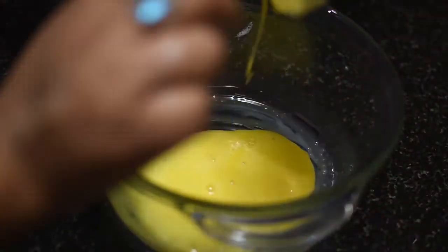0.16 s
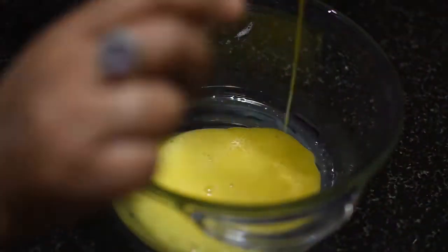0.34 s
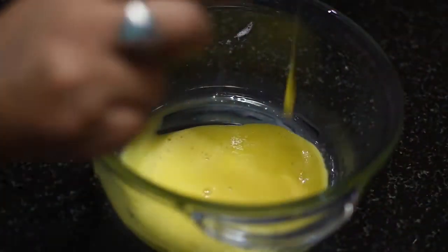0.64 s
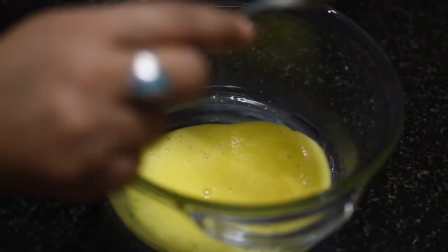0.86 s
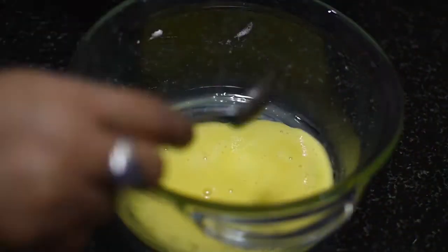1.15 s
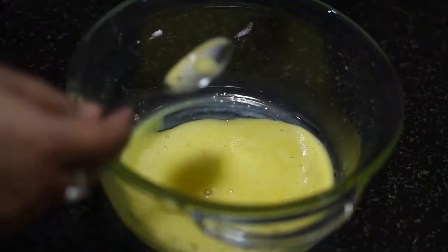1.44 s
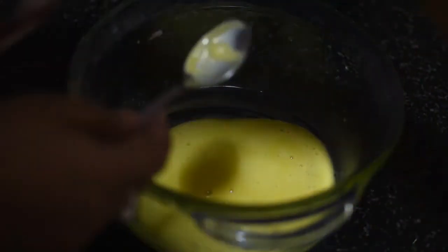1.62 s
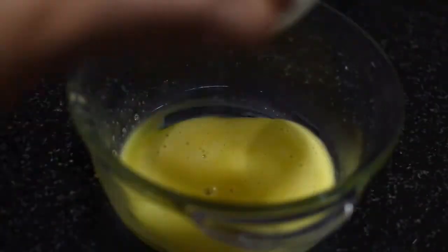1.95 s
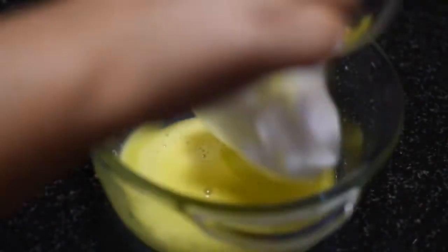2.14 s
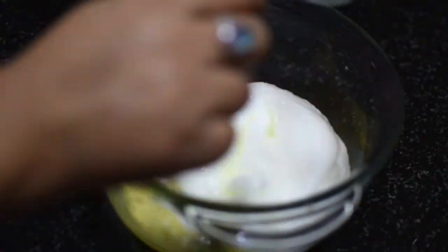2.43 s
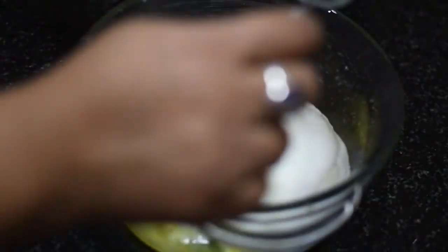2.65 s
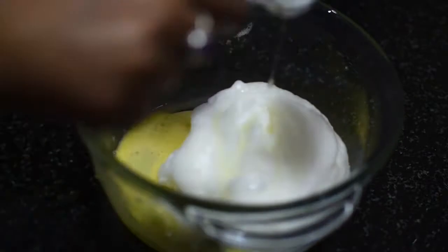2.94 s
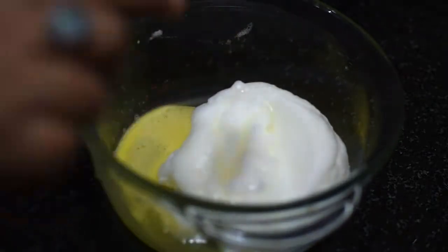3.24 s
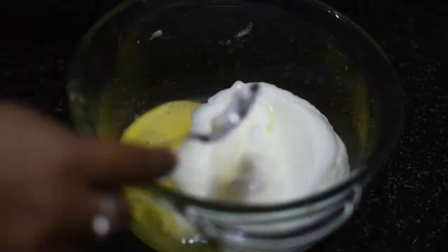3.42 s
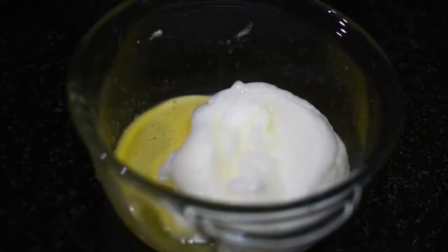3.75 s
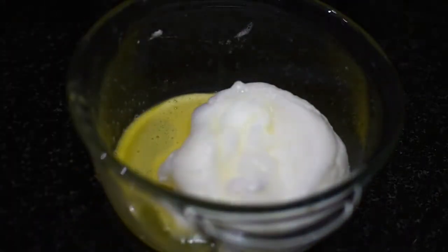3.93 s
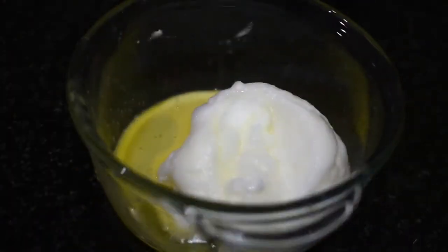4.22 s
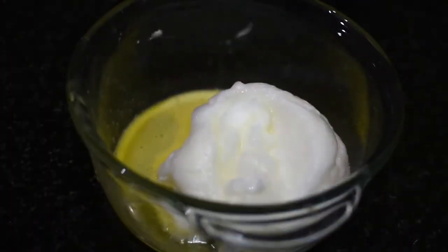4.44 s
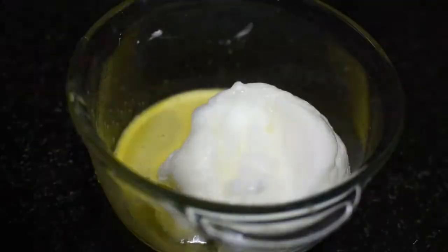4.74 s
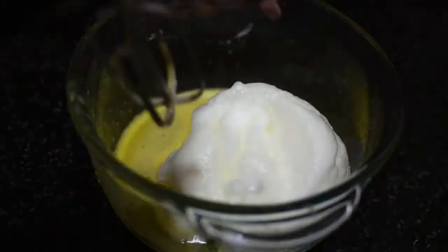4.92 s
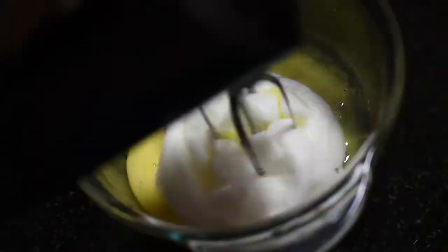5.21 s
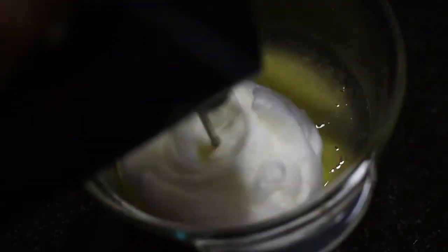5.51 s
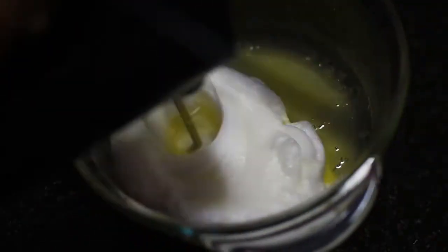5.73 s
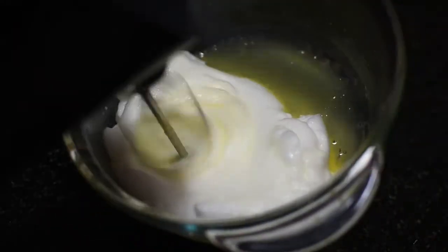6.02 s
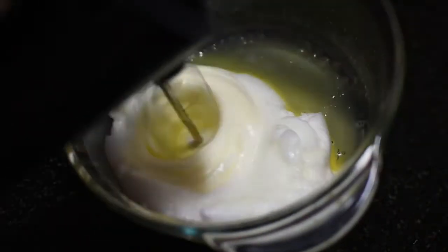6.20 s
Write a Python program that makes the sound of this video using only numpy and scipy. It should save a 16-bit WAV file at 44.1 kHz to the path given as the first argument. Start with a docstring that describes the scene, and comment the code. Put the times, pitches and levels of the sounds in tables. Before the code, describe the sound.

An electric hand mixer whines loudly at the very start and cuts off after a tenth of a second. A spoon then knocks and scrapes inside a cup until about 1.3 seconds, and the cup is set down around 1.7. From 2.3 to 3.3 seconds the spoon scrapes and taps a dish, a little more softly, with dull bumps on the counter. At about 4.2 the dish lands with a sharp clack and slides briefly. Wire beaters tap a glass bowl at 4.5 and clatter loudly against it near 4.8, followed by a few faint ticks. At 5.8 the mixer restarts with a jolt, its whine climbing quickly over rattling gears, and runs until the end at about 6.4 seconds. Every ring and scrape is clipped short, as though the action were sped up. It is all close, over the faint rush of a quiet kitchen.

```python
"""An electric hand mixer whips eggs in a glass bowl: its gears rattle and its motor whines, then it stops.
A spoon knocks and scrapes yolk out of a cup, then foam out of a dish, making each one ring.
The beaters clatter on the bowl, and the motor spins up again, close by in a quiet kitchen.
The action is sped up by cutting it into short slices, so every ring and scrape ends abruptly."""
import sys
import numpy as np
from scipy import signal
from scipy.fft import rfft, irfft, next_fast_len
from scipy.io import wavfile
from scipy.ndimage import uniform_filter1d, map_coordinates

SR = 44100
rng = np.random.default_rng(int(sys.argv[2]) if len(sys.argv) > 2 else 0)


def materialize(psi):
    """Save the field psi as 16-bit PCM at rate SR to the path in sys.argv[1].

    A 1-D psi becomes a single channel; in a 2-D psi each row is a channel.
    """
    bounded = np.clip(np.atleast_2d(psi).T, -1, 1)
    quanta = np.round(bounded * 32767).astype(np.int16)
    wavfile.write(sys.argv[1], SR, quanta)


N = 280917
T = np.arange(N) / SR

# Tones of the motor, gears and fan: times_shaft_speed, level_db, unsteadiness_radians
MOTOR_TONES = [(1.5, -28, 0.97), (2, -18.5, 0.4), (3.28, -36, 0.68), (3.44, -26, 0.45), (4, -20, 0.62),
               (4.66, -17.5, 0.32), (5.95, -21.5, 0.79), (6.2, -16.5, 0.3), (8, -21.5, 0.74),
               (10, -10.5, .3), (11.3, -30, .7), (20, -28, 0.35)]
# Pitches where the motor's whine swells as it climbs in steps: pitch_hz, width_hz, boost_db
WHINE_SWELLS = [(1286, 110, 7.5), (2850, 180, 6.5), (5260, 760, 16.5), (6300, 320, 13.5), (6800, 200, 9)]
# Tone color of the gear noise, before the stop and after the restart: pitch_hz, level_db
FIRST_GEAR_COLOR = [(59, -62), (100, -45), (214, -44), (307, -19), (382, -7), (457, -17), (605, -11.5),
                    (754, -13.5), (940, -10.5), (3890, -11.5), (5800, -19.5), (7990, -24), (11900, -41),
                    (15500, -78), (22000, -120)]
RESTART_GEAR_COLOR = [(59, -82), (100, -55), (289, -22), (360, -14), (467, -13.5), (739, -9.5), (1060, -10),
                      (1780, -13.5), (2050, -15), (2310, -10), (3180, -11), (3660, -12.5), (4380, -12),
                      (10400, -31.5), (11900, -47), (15500, -84), (22000, -120)]
# Modes, or ringing pitches, of the gear housing, cup, dish and bowl: pitch_hz, width_hz, boost_db
HOUSING_MODES = [(597, 120, 7.5), (757, 41, 4), (1223, 74, 7.5), (1815, 330, 7.5), (2340, 180, 5.5),
                 (2810, 220, 3), (3626, 160, 5)]
CUP_MODES = [(1062, 200, 1.5), (1326, 170, 2.5), (2890, 300, 5), (3300, 200, 3), (3990, 330, 4),
             (5570, 520, 5), (8460, 240, 8), (9530, 330, 5.5)]
DISH_MODES = [(988, 260, 3.9), (1343, 116, 3.1), (2480, 245, 7.3), (4150, 250, 9.1), (5230, 190, 6.3),
              (6680, 205, 17.6), (9230, 370, 10), (9970, 210, 13)]
BOWL_MODES = [(1398, 31, 20.4), (1695, 77, 9.4), (3220, 50, 16), (4861, 52, 5.8), (5760, 80, 21.7),
              (7360, 74, 17), (8780, 56, 23.6), (9600, 80, 18.6)]
# Tone color that each way of touching puts into the object: pitch_hz, level_db
CUP_KNOCK_COLOR = [(120, -31), (750, -19), (1100, 0.5), (3000, -8.5), (5800, -12.5), (9800, -22.5),
                   (12000, -41)]
CUP_SCRAPE_COLOR = [(120, -33.5), (700, -14), (1250, 0.5), (3000, -2), (5800, -5.5), (9500, -18.5),
                    (12000, -31)]
CUP_COUNTER_COLOR = [(120, -25), (600, -9), (1300, 2), (3000, -9), (5800, -33), (9500, -38), (12000, -55)]
DISH_KNOCK_COLOR = [(120, -27.5), (700, -21), (1000, -5), (1350, 1), (3000, -6), (4200, -7), (6600, -9),
                    (9500, -16), (11000, -26.5), (12000, -38.5)]
DISH_SCRAPE_COLOR = [(120, -24), (500, -13), (1250, 3), (3000, -2.5), (5800, -8), (9500, -23.5),
                     (12000, -33)]
DISH_COUNTER_COLOR = [(120, -24.5), (450, -9), (900, -5), (1300, 1), (2200, -8.5), (3000, -15), (5800, -26),
                      (10000, -33), (12000, -55)]
BOWL_TOUCH_COLOR = [(120, -34), (300, -3.5), (1250, -0.5), (3000, -6.5), (5800, -19.5), (9000, -27.5),
                    (12000, -39)]
# One row for each touch. The spot touched favors one pitch; a freedom of 0 mutes the object's modes.
# Columns: start_s, level_db, brightness_db_per_octave, pitch_hz, freedom
CUP_KNOCKS = [(.1295, -17.5, -.6, 1392, 0.46), (.285, -20.3, 2, 5790, 1.4), (.397, -32.5, 2, 3920, .6),
              (.4645, -22.5, .5, 9600, 0.38), (.5655, -21.5, -0.5, 9600, 1.2), (.847, -19, -0.4, 9650, .5)]
CUP_SCRAPES = [(.14, -26.5, -2.5, 1144, 1), (.226, -30, -3, 1080, 1), (.357, -23.5, -1, 9450, .2),
               (.581, -29.5, -3, 2630, .5), (.624, -22.5, 2, 1377, 1.2), (.711, -21.5, 2.5, 8200, 0.93),
               (.728, -14.5, 3, 5620, 0.82), (.933, -25, 3.5, 4990, 1.3), (1.022, -30.5, 0.5, 5340, 0.79),
               (1.11, -29, -1.8, 5430, 0.99), (1.198, -32.5, -1.5, 3110, 1), (1.214, -25, 0, 3300, 2),
               (1.286, -34, -1, 1350, 2.5)]
CUP_LANDINGS = [(1.595, -26.5, 3.5, 1390, .3), (1.683, -19, -2.5, 1424, .1)]
DISH_KNOCKS = [(2.571, -24, -1.7, 2400, 1.02), (2.901, -38.5, 1, 2600, .3),
               (3.0135, -23, -0.034, 1526, 0.18), (3.3215, -18.5, 0.67, 2660, 1.43)]
DISH_SCRAPES = [(2.302, -44.5, -1, 6600, 0.27), (2.478, -37, 0, 1065, .2), (2.526, -33.5, -2, 2400, 0.71),
                (2.656, -34, 3, 6460, .3), (2.743, -29, 1, 2310, 1.3), (2.82, -35.5, -0.5, 1080, .5),
                (2.878, -31.5, -7, 2240, .3), (2.966, -33, -1.5, 876, .3), (3.098, -29.5, 0.5, 1950, 0.89),
                (3.185, -24, 1.6, 2255, 0.59), (4.069, -26.5, 5, 6850, .7)]
DISH_LANDINGS = [(4.1765, -13, 0.33, 10240, 0.3)]
DISH_SLIDES = [(4.158, -18.5, 0.48, 6900, .4), (4.2, -16.5, -0.21, 6970, 0.49), (4.245, -11.8, 2, 4350, 1),
               (4.29, -22.5, -1.5, 1160, 1)]
BOWL_TAPS = [(4.534, -33.5, -.5, 3260, .2), (4.687, -32, -.2, 1100, 0.37)]
BOWL_RUBS = [(4.574, -32.5, -0.5, 1510, .5), (4.6, -28, 1.4, 5630, 0.38), (4.732, -15.5, -1, 1624, 0.57),
             (4.746, -9, 3.5, 1483, 1.2), (4.775, -13.5, 0.5, 1500, 0.99), (4.794, -14, -3.5, 3260, 1.3),
             (4.82, -26.5, -1.5, 3280, 1.08)]
# Faint ticks of the wire beaters as the mixer is brought over: start_s, level_db
BEATER_TICKS = [(3.86, -44), (5.135, -48), (5.18, -37.5), (5.349, -44.5), (5.395, -53)]
# Dull bumps on the counter: start_s, level_db, pitch_hz, width_hz, fade_s (time to fall 60 dB)
COUNTER_BUMPS = [(0.359, -36.5, 145, 110, 0.31), (0.871, -34.5, 145, 79, 0.24), (1.96, -37, 180, 150, 0.15),
                 (2.48, -32.5, 322, 192, 0.28), (4.173, -30, 110, 240, 0.14)]
# Tone color of the quiet room: pitch_hz, level_db
ROOM_COLOR = [(15, -65.5), (25, -34.5), (65, -10.5), (182, -2.5), (218, -12.5), (283, -4), (348, -6),
              (450, -1.5), (525, -4), (613, -5.5), (1300, -7), (3040, -17), (9700, -42.5), (11900, -52),
              (15500, -94), (22000, -120)]
# Stereo width, or how strong the sides are next to the middle: pitch_hz, side_db
STEREO_WIDTH = [(100, -25), (400, -23), (1400, -20.5), (2800, -13.5), (5600, -10.5), (9500, -5.5)]

FIRST_CUT_S, SLICE_S = 0.094, 0.04415  # the action jumps ahead at evenly spaced cuts
RESTART_S = 5.789


def mixer(speed_hz, level_db, gear_color, gears_db, tones_db, hum_db, whine_db, rattle_db, low_cut_hz):
    """Gears rattle in the housing once a turn; the motor and fan sing at multiples of the shaft speed."""
    shaft_hz = speed_hz * (1 + 0.00093 * wobble(40))
    angle = 2 * np.pi * np.cumsum(shaft_hz) / SR
    pace = np.clip(shaft_hz / 375, 0, 1.1)  # about 1 at full speed
    grind = noise(lambda hz: amp(curve_at(gear_color, hz)) * resonances(HOUSING_MODES, hz), size=N)
    dull = signal.sosfiltfilt(signal.butter(4, 3300, fs=SR, output="sos"), grind)
    grind = dull + (grind - dull) * pace ** 4  # slow gears sound duller
    # The beaters turn far slower than the shaft and load the gears unevenly.
    beater_load = np.cos(angle / 19)
    rattle = unit(amp(rattle_db * np.cos(angle) + 0.16 * beater_load + 0.53 * wobble(300)))
    hum_gain = amp(hum_db + beater_load + 1.6 * wobble(22)) * pace ** 4
    hum = hum_gain * np.sin(angle + 0.49 * wobble(45))
    # The motor strains, and its tones turn rough, while it is gathering speed.
    strain = np.clip(1 - pace, 0, 0.4)
    chatter = 5.6 * strain * wobble(350)
    tones = np.zeros(N)
    for multiple, db, unsteady in MOTOR_TONES:
        lift_db = whine_db * multiple / 20  # the whine lifts the high tones most
        swell = resonances(WHINE_SWELLS, multiple * shaft_hz)
        gain = amp(db + lift_db + 4.9 * unsteady * wobble(25)) * swell
        tones += gain * np.sin(multiple * angle + unsteady * wobble(45) + chatter * multiple / 14)
    gears = amp(gears_db) * grind * rattle
    motor = np.sqrt(2) * (hum + amp(tones_db) * np.sqrt(pace) * tones)
    low_cut = signal.butter(2, low_cut_hz, "high", fs=SR, output="sos")  # a small body gives little bass
    return amp(level_db) * signal.sosfilt(low_cut, gears + motor)


def spin_up(full_hz, surge_hz, surge_s, creep_hz, creep_s):
    """Shaft speed in Hz: the motor breaks free, surges, then creeps to full speed, slice by slice."""
    slice_middle = next_cut(T) - SLICE_S / 2
    glide = 0.375  # share of the rise heard inside a slice; the rest is a step at the cut
    running_s = np.maximum(slice_middle + glide * (T - slice_middle) - RESTART_S, 0)
    speed_hz = full_hz - surge_hz * np.exp(-running_s / surge_s) - creep_hz * np.exp(-running_s / creep_s)
    breaking_free = 1 - 0.58 * np.exp(-np.maximum(T - RESTART_S, 0) / 0.018)
    return breaking_free * uniform_filter1d(speed_hz, size=180)


def start_jolt(start_s, level_db, pitch_hz, width_hz, swell_s):
    """The twist of the starting motor jolts the housing, which rings briefly."""
    track, t = np.zeros((2, N)), np.arange(2048) / SR
    ring = noise_band(pitch_hz, width_hz, size=len(t))
    swell = (t / swell_s) ** 2 * np.exp(2 * (1 - t / swell_s))
    add(track, start_s, amp(level_db) * ring * swell)
    return track


def bowl():
    """The beaters tap the glass bowl and rub along it."""
    glass = dict(modes=BOWL_MODES, tail_db=-19, tail_db_per_s=226, dull_hz=4000)
    taps = touches(BOWL_TAPS, BOWL_TOUCH_COLOR, spot_db=14, purity=0.05, fade_db_per_s=128,
                   click_db=12, click_s=0.0022, **glass)
    rubs = touches(BOWL_RUBS, BOWL_TOUCH_COLOR, spot_db=10.5, purity=0.15, fade_db_per_s=100, **glass)
    return taps + rubs


def cup():
    """The spoon knocks and scrapes the yolk out of the cup, which is then set down."""
    body = dict(modes=CUP_MODES, tail_db=-17.5, tail_db_per_s=150, dull_hz=6980)
    knocks = touches(CUP_KNOCKS, CUP_KNOCK_COLOR, spot_db=13, purity=0.2, fade_db_per_s=169.5,
                     click_db=15, click_s=0.0043, **body)
    scrapes = touches(CUP_SCRAPES, CUP_SCRAPE_COLOR, spot_db=11.5, purity=0.08,
                      fade_db_per_s=117.5, **body)
    landing = touches(CUP_LANDINGS, CUP_COUNTER_COLOR, spot_db=7.5, purity=0.05,
                      fade_db_per_s=124, **body)
    return knocks + scrapes + landing


def dish():
    """The spoon knocks and scrapes the foam out of the dish, which lands on the counter and slides."""
    body = dict(modes=DISH_MODES, tail_db=-16.5, tail_db_per_s=310, dull_hz=4070)
    knocks = touches(DISH_KNOCKS, DISH_KNOCK_COLOR, spot_db=9.5, purity=0.25, fade_db_per_s=109,
                     click_db=14.5, click_s=0.0041, **body)
    scrapes = touches(DISH_SCRAPES, DISH_SCRAPE_COLOR, spot_db=10.5, purity=0.056,
                      fade_db_per_s=116, **body)
    landing = touches(DISH_LANDINGS, DISH_COUNTER_COLOR, spot_db=12, purity=0.05, fade_db_per_s=130,
                      click_db=13, click_s=0.0033, **body)
    slides = touches(DISH_SLIDES, DISH_COUNTER_COLOR, spot_db=11, purity=0.14, fade_db_per_s=66, **body)
    return knocks + scrapes + landing + slides


def touches(rows, touch_color, modes, spot_db, purity, fade_db_per_s, tail_db, tail_db_per_s, dull_hz,
            click_db=None, click_s=None):
    """Each touch rings the object, a knock with a click first; the next cut leaves a faint, dull tail."""
    track, t = np.zeros((2, N)), np.arange(8192) / SR
    for start_s, level_db, brightness, pitch_hz, freedom in rows:
        length_s = next_cut(start_s + 0.005) - start_s  # at least 5 ms
        spot = [(pitch_hz, 60 + 0.04 * pitch_hz, spot_db)]
        echo_s = rng.uniform(0.000595, 0.0016)  # the trip to the object's wall and back varies by stroke
        tone_share = min(purity * freedom, 1)

        def color(hz):
            """Strength of each pitch; a pressed utensil lets the object ring less freely."""
            push = amp(curve_at(touch_color, hz) + brightness * np.log2(1 + hz / 300))
            wall_echo = np.abs(1 + 0.33 * np.exp(-2j * np.pi * hz * echo_s))
            return push * resonances(modes, hz) ** freedom * resonances(spot, hz) * wall_echo

        def voice(shape):
            """Scratchy noise blended with clear tones of the same color."""
            scratch = noise(shape, size=len(t))
            tones = ringing(list(modes) + spot, shape, size=len(t))
            return np.sqrt(1 - tone_share) * scratch + np.sqrt(tone_share) * tones

        loudness = amp(-fade_db_per_s * t) * np.clip(t / 0.0029, 0, 1)
        if click_db is not None:
            click = amp(click_db) * np.exp(-t / click_s) * np.clip(t / 0.0011, 0, 1)
            loudness = np.hypot(loudness, click)
        tail = voice(lambda hz: color(hz) / np.hypot(1, hz / dull_hz))
        tail *= amp(tail_db - tail_db_per_s * (t - length_s))
        ring = voice(color) * loudness
        past_cut = np.clip((t - length_s) / 0.0041, 0, 1)
        add(track, start_s, amp(level_db) * (ring * (1 - past_cut) + tail * past_cut))
    return track


def ringing(modes, color, size):
    """An object rings with one slightly drifting tone for each mode, spread in stereo."""
    hz, width_hz, _ = np.transpose(modes)[:, :, None]
    gain = color(hz) * np.sqrt(width_hz) * amp(rng.normal(0, 1.4, hz.shape))
    drift = np.cumsum(rng.normal(0, 0.021, (len(hz), size)), axis=1)
    phase = 2 * np.pi * (hz * np.arange(size) / SR + rng.random(hz.shape)) + drift
    spread = np.arctan(amp(curve_at(STEREO_WIDTH, hz))) * rng.choice([-1, 1], hz.shape)
    return unit(np.array([np.sum(gain * np.sin(phase + side * spread), axis=0) for side in (-1, 1)]))


def counter_bumps():
    """The counter carries soft, low knocks."""
    track, t = np.zeros((2, N)), np.arange(SR // 4) / SR
    for start_s, level_db, pitch_hz, width_hz, fade_s in COUNTER_BUMPS:
        thud = noise_band(pitch_hz, width_hz, size=len(t))
        add(track, start_s, amp(level_db - 60 * t / fade_s) * thud * np.clip(t / 0.0047, 0, 1))
    return track


def beater_ticks(bright_hz, fade_s):
    """The loose beaters tick in their sockets."""
    track, t = np.zeros((2, N)), np.arange(SR // 30) / SR
    for start_s, level_db in BEATER_TICKS:
        tick = noise(lambda hz: hz / (hz + 700) / (1 + (hz / bright_hz) ** 2), size=len(t))
        add(track, start_s, amp(level_db - 60 * t / fade_s) * tick)
    return track


def kitchen(level_db):
    """The quiet rush of the room, slightly restless."""
    gain = amp(level_db + 0.43 * wobble(9) + 0.3 * wobble(12))
    return gain * noise(lambda hz: amp(curve_at(ROOM_COLOR, hz)), size=N)


def next_cut(time_s):
    """The time at which the current slice ends."""
    return FIRST_CUT_S + SLICE_S * np.ceil((time_s - FIRST_CUT_S) / SLICE_S)


def resonances(peaks, hz):
    """How much each pitch is boosted: most near the listed peaks, hardly at all far from them."""
    boost = sum((amp(abs(db)) ** 2 - 1) / (1 + (2 * (hz - center) / width) ** 2) ** 2
                for center, width, db in peaks)
    return np.sqrt(1 + boost)


def noise(color, size):
    """Stereo noise with the given tone color, wider in the treble."""
    hz = np.fft.rfftfreq(size, 1 / SR)
    spectrum = color(hz) * np.exp(2j * np.pi * rng.random((2, len(hz))))
    middle, side = irfft(spectrum * [np.ones(len(hz)), amp(curve_at(STEREO_WIDTH, hz))], size)
    return unit(np.array([middle + side, middle - side]))


def noise_band(pitch_hz, width_hz, size):
    """Stereo noise gathered around one pitch."""
    return noise(lambda hz: 1 / (1 + (2 * (hz - pitch_hz) / width_hz) ** 2), size)


def wobble(per_second):
    """A smooth curve through this many random points a second."""
    points = rng.standard_normal(int(N * per_second / SR) + 4)
    coarse_s = T[::16]
    return np.interp(T, coarse_s, map_coordinates(points, [coarse_s * per_second]))


def curve_at(points, hz):
    """Read between the rows of a (pitch_hz, value) table, with octaves evenly spaced."""
    pitches, values = np.transpose(points)
    return np.interp(np.log(hz + 1), np.log(pitches + 1), values)


def amp(db):
    """Turn decibels into a factor to multiply by."""
    return 10 ** (np.asarray(db) / 20)


def unit(sound):
    """Scale a sound to an average power of 1."""
    return sound / np.sqrt(np.mean(sound ** 2) + 1e-20)


def add(track, start_s, sound):
    """Mix a sound into the track at the given time."""
    part = track[:, max(round(start_s * SR), 0):][:, :sound.shape[-1]]
    part += sound[..., :part.shape[1]]


def scene():
    """A moment of mixer, spoon work, clatter on the bowl, then the mixer again."""
    first_run = mixer(speed_hz=386.3, level_db=-17.5, gear_color=FIRST_GEAR_COLOR, gears_db=1.5,
                      tones_db=-10.5, hum_db=-4.5, whine_db=17.5, rattle_db=1, low_cut_hz=170)
    first_run *= np.clip((0.098 - T) / 0.0058, 0, 1)  # stops at the first cut
    speed_hz = spin_up(full_hz=385.9, surge_hz=220, surge_s=0.066, creep_hz=47, creep_s=0.27)
    effort_db = -12.5 - 7 * np.maximum(T - RESTART_S, 0)  # eases off after the restart
    second_run = mixer(speed_hz, effort_db, RESTART_GEAR_COLOR, gears_db=-0.2,
                       tones_db=1, hum_db=-8, whine_db=0.5, rattle_db=0.5, low_cut_hz=224)
    second_run *= np.clip((T - RESTART_S) / 0.013, 0, 1)
    jolt = start_jolt(start_s=5.792, level_db=-11.5, pitch_hz=756, width_hz=110, swell_s=0.012)
    clatter = cup() + dish() + bowl()
    background = counter_bumps() + beater_ticks(bright_hz=2500, fade_s=0.016) + kitchen(level_db=-44)
    return first_run + second_run + jolt + clatter + background


def record(dry):
    """The loudest clicks overload softly, and the highest treble is cut away."""
    softened = dry / (1 + np.abs(dry) ** 8) ** (1 / 8)
    size = next_fast_len(N + SR // 4)
    hz = np.fft.rfftfreq(size, 1 / SR)
    treble_cut = 1 / (1 + (hz / 11750) ** 80)
    return irfft(rfft(softened, size) * treble_cut, size)[:, :N]


dry = scene()
out = record(dry)
materialize(out)
```